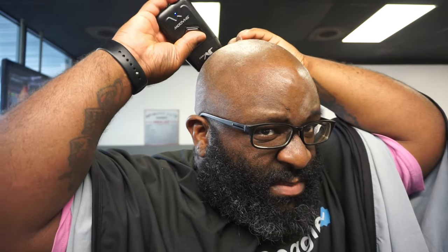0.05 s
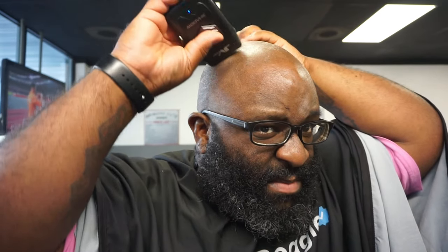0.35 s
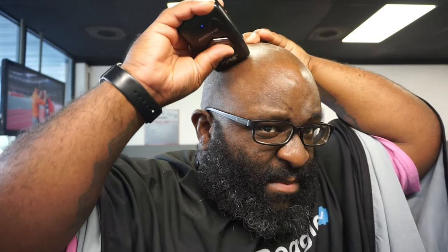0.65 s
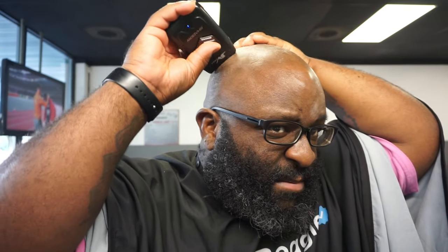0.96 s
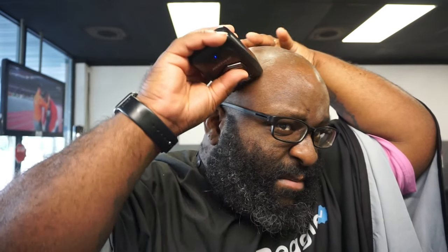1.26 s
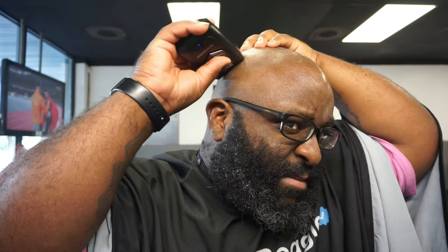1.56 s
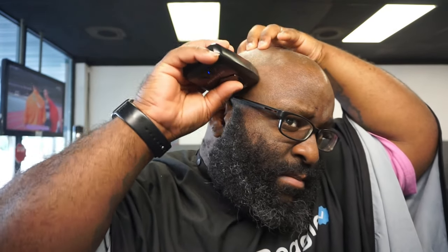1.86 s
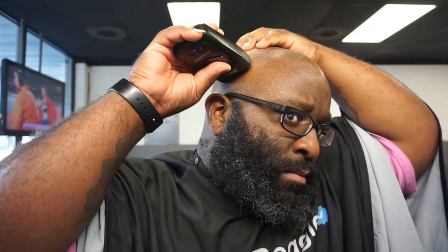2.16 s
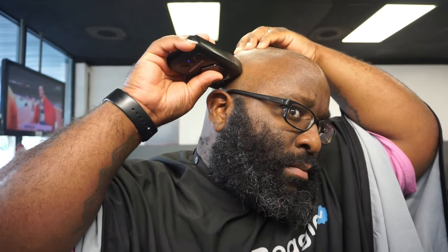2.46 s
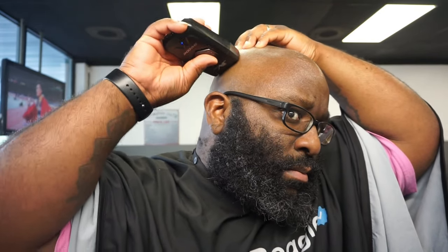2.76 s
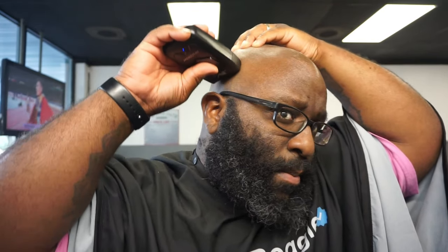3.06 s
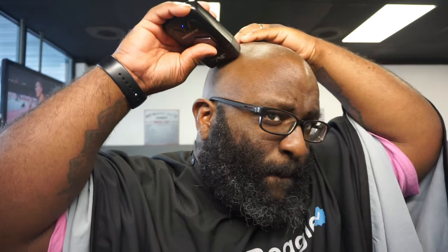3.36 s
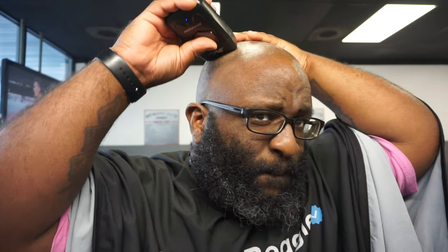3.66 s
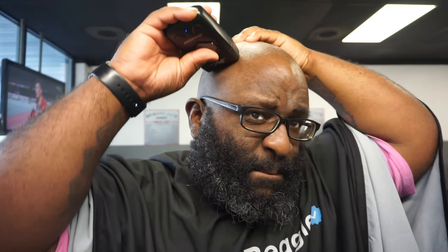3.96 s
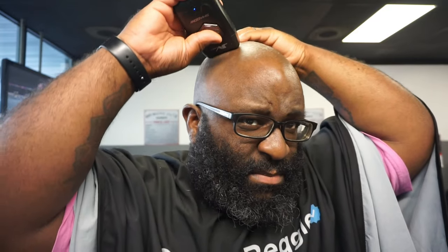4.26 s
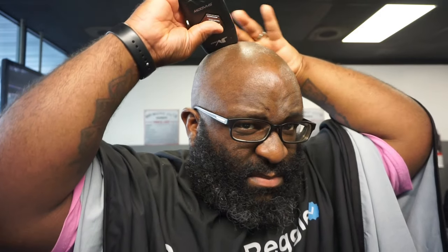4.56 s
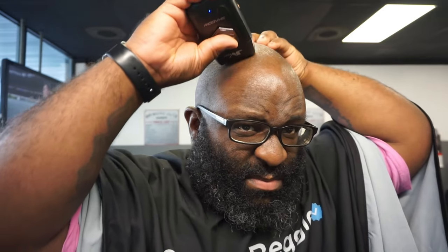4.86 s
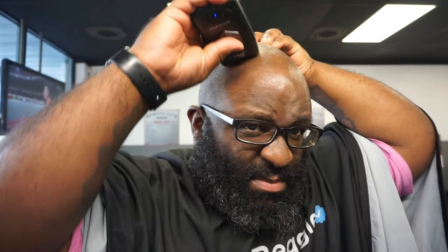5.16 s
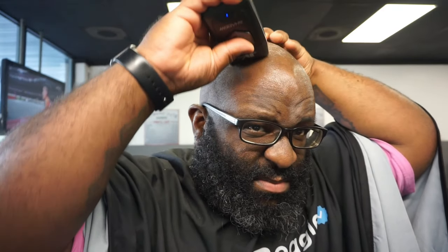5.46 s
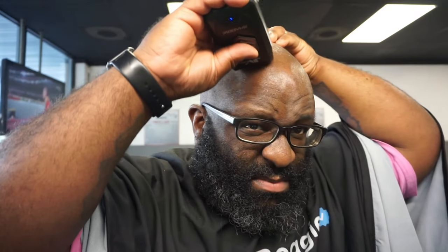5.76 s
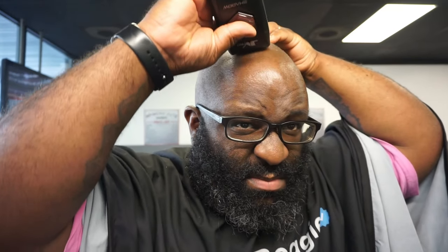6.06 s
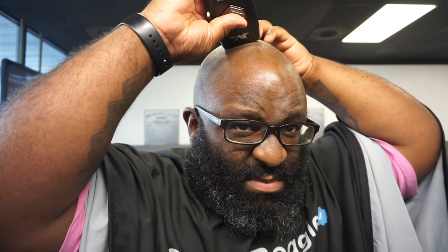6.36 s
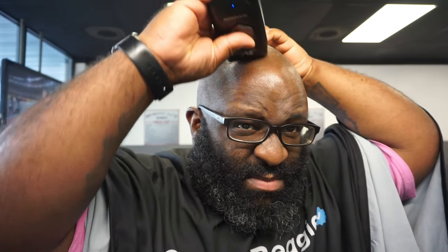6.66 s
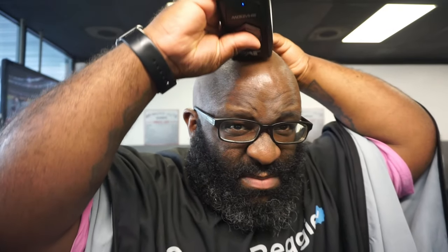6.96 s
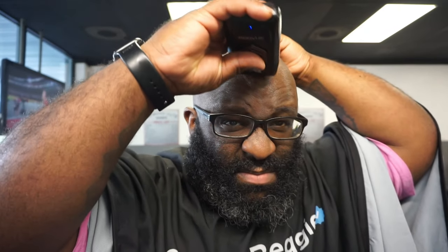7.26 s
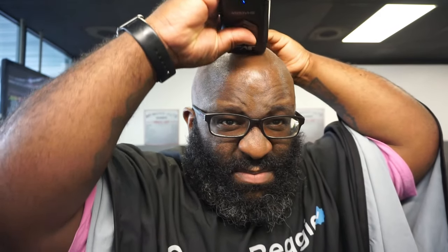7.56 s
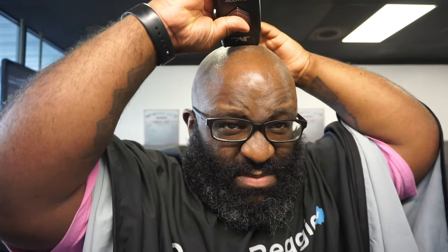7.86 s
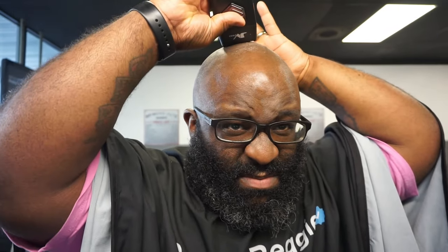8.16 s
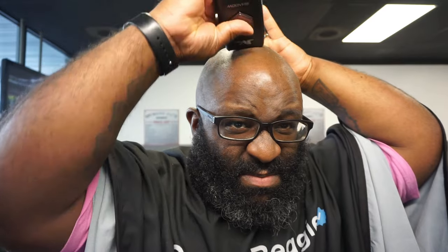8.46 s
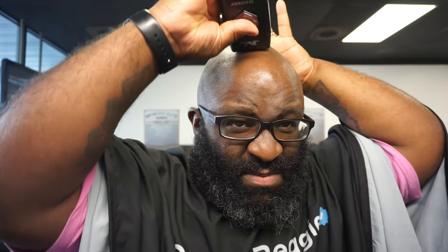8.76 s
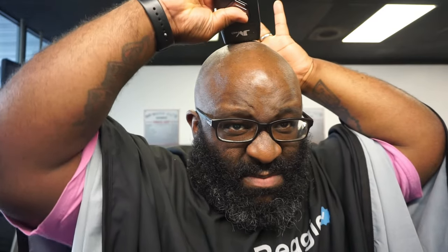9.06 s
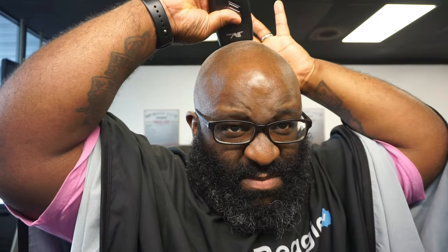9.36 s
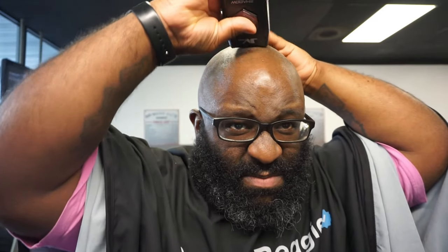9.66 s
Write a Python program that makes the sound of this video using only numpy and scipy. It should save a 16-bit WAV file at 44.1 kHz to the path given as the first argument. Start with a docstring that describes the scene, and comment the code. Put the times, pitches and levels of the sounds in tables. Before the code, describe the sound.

An electric foil shaver is already running, close to the microphone, and keeps going for the whole ten seconds or so as it moves over a scalp. Its motor buzz wavers slightly in pitch, with a bright, fluttering blade hiss on top. Short strokes through stubble, each a tenth to a third of a second, add a louder rattling rasp, often with a sharp little bite. They come irregularly from 0.3 to 3 seconds, near 3.8, from 4.6 to 5.9, from 6.5 to 7.4, around 8.5 and at 9.6. Between them the shaver glides with a softer whirr and hiss. The foil squeaks briefly on the skin near 0.9, 4.5, 8.3 and 9.4 seconds, and sings thinly around 2, 4.4 and 9 seconds. A faint electrical hum and low rumble of a small shop sit underneath.

```python
"""A small shop, a camera's stereo microphone close to a scalp being shaved with an electric foil shaver.
In each stroke the cutter knocks and rattles against the foil once a turn; between strokes the head
glides, the motor slows and the blades hiss. Now and then the foil squeaks or sings. Mains hum and rumble
lie underneath, ducked with everything else by the camera's gain control."""
import sys
import numpy as np
from scipy import signal
from scipy.fft import rfft, irfft, next_fast_len
from scipy.io import wavfile
from scipy.ndimage import uniform_filter1d, minimum_filter1d, map_coordinates

SR = 44100
rng = np.random.default_rng(int(sys.argv[2]) if len(sys.argv) > 2 else 0)


def wav_record(signal):
    """Record a signal, one row per channel, as 16-bit PCM in the file named by sys.argv[1]."""
    frames = np.transpose(np.atleast_2d(signal))
    bounded = np.clip(frames, -1, 1)
    # unit amplitude maps onto the largest positive 16-bit level
    quanta = np.round(bounded * 32767).astype(np.int16)
    wavfile.write(sys.argv[1], SR, quanta)


N = 428211
TIME = np.arange(N) / SR


def amp(db):
    """Decibels to gain."""
    return 10 ** (np.asarray(db) / 20)


def unit(x):
    """Scaled to rms 1."""
    return x / np.sqrt(np.mean(x ** 2) + 1e-20)


def even(x, size=1700):
    """Scaled to rms 1 over every few turns of the motor."""
    return x / np.sqrt(np.abs(uniform_filter1d(x ** 2, size)) + 1e-6 * np.mean(x ** 2))


def along(points, hz):
    """(f/Hz, value) points read on a log frequency axis."""
    freqs, values = np.transpose(points)
    return np.interp(np.log(hz + 1), np.log(freqs + 1), values)


def curves(rows):
    """One value per sample for each column after the time."""
    times, *columns = np.transpose(rows)
    return [np.interp(TIME, times, column) for column in columns]


def wobble(rate, times=TIME):
    """A smooth random curve, rate knots a second."""
    return map_coordinates(rng.standard_normal(1024), [times * rate], mode='wrap')


def swell(start, end):
    """A soft-edged window from start to end."""
    return np.sqrt(np.abs(np.sin(np.pi * np.clip((TIME - start) / (end - start), 0, 1))))


def blend(share, a, b):
    """Power mix: this share of a, the rest of b."""
    return np.sqrt(share) * a + np.sqrt(1 - share) * b


def filtered(x, response):
    """x times a response of frequency."""
    size = next_fast_len(N + SR // 2)
    return irfft(rfft(x, size) * response(np.fft.rfftfreq(size, 1 / SR)), size)[..., :N]


def ring(x, spectrum, size=4096):
    """x through a minimum-phase body with this spectrum."""
    cepstrum = irfft(np.log(amp(along(spectrum, np.fft.rfftfreq(size, 1 / SR)))))
    cepstrum[1:size // 2] *= 2
    cepstrum[size // 2 + 1:] = 0
    return signal.oaconvolve(x, irfft(np.exp(rfft(cepstrum))))[:N]


def pulses(times, strength, size=8):
    """Impulses at these times, placed between samples."""
    at = times[:, None] * SR
    taps = np.floor(at) + np.arange(1 - size, size + 1)
    shape = np.sinc(taps - at) * np.cos(np.pi * (taps - at) / (2 * size)) ** 2
    index = np.clip(taps, 0, N).astype(int)
    return np.bincount(index.ravel(), (strength[:, None] * shape).ravel(), N + 1)[:N]


def contacts(turns, place, spread, jitter_s, scatter_db, drift, count):
    """Parts touch count times a turn, over spread turns around place, drifting as the grip changes."""
    whole_turns = np.arange(-1, np.ceil(turns[-1]))
    turn_times = np.interp(whole_turns, turns, TIME)
    train = np.zeros(N)
    for k in range(count):
        phase = place + spread * ((k + .5) / count - .5) + drift * wobble(4, turn_times)
        late, strong = rng.standard_normal((2, 2048))[:, :len(turn_times)]
        when = np.interp(whole_turns + phase, turns, TIME, left=-1, right=-1) + jitter_s * late
        train += pulses(when, (when > 0) * wobble(6, turn_times) * amp(scatter_db * strong))
    return even(train)


def scrape(gate):
    """Friction noise under a gate."""
    return unit(gate * rng.standard_normal(N))


def lobe(turns, place, sharp):
    """A smooth bump once a turn."""
    return np.exp(sharp * (np.cos(2 * np.pi * (turns - place)) - 1))


# room tone, hum lines and rumble shape: f/Hz, level/dB
MAINS_HUM = [(60, -54), (120, -44), (180, -65)]
RUMBLE_SPECTRUM = [(15,-18),(30,-1),(55,-9),(90,-4.5),(160,2),(240,-3.5),(400,-5),(1000,-5),(4000,-54),(16000,-37)]


def room_tone(rumble_db=-45):
    """The shop behind the shaver: mains hum over a low rumble of air."""
    hum = sum(amp(db) * np.sin(2 * np.pi * (hz * TIME + rng.random())) for hz, db in MAINS_HUM)
    rumble = unit(ring(rng.standard_normal(N), RUMBLE_SPECTRUM))
    return np.sqrt(2) * hum + amp(rumble_db) * rumble


# what head, arm and walls send back to the microphone: f/Hz, level/dB
REFLECTED_SPECTRUM = [(100,-26),(500,-11),(1500,-16.5),(2800,-5.5),(6000,-4),(15000,-3.5)]
# the shop's reverberation time: f/Hz, t60/s
ROOM_DECAY = [(200,0.38),(3000,0.16),(15000,0.077)]


def reflections(x, near_s, far_db):
    """Close by, head and arm scatter the sound, differently to each port; the walls ring on longer."""
    hz, t, noise = signal.stft(rng.standard_normal((2, SR // 4)), SR, nperseg=256)
    walls = signal.istft(noise * amp(-60 * t / along(ROOM_DECAY, hz)[:, None]), SR, nperseg=256)[1]
    age = TIME[:walls.shape[1]]
    scatter = rng.standard_normal(len(age)) * np.exp(-age / near_s)
    near = np.array([[.4], [-.4]]) * scatter / np.linalg.norm(scatter)
    far = amp(far_db) * walls / np.linalg.norm(walls[0])
    reflected = signal.oaconvolve(x[None], near + far, axes=1)[:, :N]
    return filtered(reflected, lambda hz: amp(along(REFLECTED_SPECTRUM, hz)))


# the case's hum: t/s, level/dB at twice the motor speed, level/dB at three times
CASE_ORDERS = [(0.0, -47.5, -46), (3.2, -42, -48.5), (3.55, -50.0, -48.5), (4.15, -42.5, -48.5),
               (4.35, -62, -51), (4.5, -50.0, -45.5), (5.5, -44.5, -52), (6.15, -47.5, -49.5),
               (7.55, -48, -52.5), (7.9, -42.5, -39), (9.15, -49.5, -50.5), (9.7, -43.5, -42)]


def housing(turns):
    """The swinging cutters shake the case at low multiples of the speed; the hand damps it unevenly."""
    return np.sqrt(2) * sum(amp(db + 1.15 * wobble(12)) * np.sin(2 * np.pi * order * turns)
                            for order, db in enumerate(curves(CASE_ORDERS), 2))


# thin tones from the foil: start t/s, end t/s, multiple of the motor speed, level/dB
FOIL_WHINES = [(2.0,2.304,21,-32),(3.084,3.22,21,-32),(3.376,3.495,22,-31),(4.303,4.517,23,-28.5),(5.43,5.494,23,-35),(7.936,8.1,23,-32.5),(8.94,9.303,23,-31)]


def whines(turns):
    """One multiple of the motor speed meets the foil's resonance and sings."""
    return np.sqrt(2) * sum(amp(db) * swell(start, end) * np.sin(2 * np.pi * multiple * turns)
                            for start, end, multiple, db in FOIL_WHINES)


# the foil drawn back over the scalp: start t/s, end t/s, start f/Hz, end f/Hz, level/dB
FOIL_SQUEAKS = [(0,.2,1750,1550,-33),(.85,.96,1720,1640,-25),(1.6,1.76,1620,1560,-31),(4.45,4.6,1780,1700,-27),(8.23,8.38,1980,1620,-27),(9.29,9.5,1950,1640,-26)]


def squeaks(turns):
    """The thin foil squeaks on the skin, pulsing as the blades pass."""
    out = np.zeros(N)
    for start, end, from_hz, to_hz, db in FOIL_SQUEAKS:
        span = slice(int(start * SR), int(end * SR))
        t = TIME[span]
        hz = np.interp(t, [start, end], [from_hz, to_hz]) + 55 * wobble(300, t)
        grip = 1 + .5 * np.sin(2 * np.pi * turns[span]) + .19 * wobble(230, t)
        out[span] += amp(db) * swell(start, end)[span] * grip * np.sin(2 * np.pi * np.cumsum(hz) / SR)
    return out


# the foil's edge biting: start t/s, end t/s, resonance f/Hz, level/dB
EDGE_BITES = [(.32,.44,3670,-18),(1.022,1.122,1670,-21.5),(1.348,1.36,2280,-22),(1.85,1.97,1770,-23),(2.36,2.605,5830,-30.5),(2.545,2.619,1770,-26),(2.948,3.05,1760,-21),(3.58,3.644,3490,-28),(3.943,3.98,2180,-21),(5.107,5.236,3750,-27),(5.33,5.39,2290,-22.5),(5.83,5.907,2200,-23),(6.543,6.595,4500,-24),(6.84,6.9,2300,-24),(7.31,7.365,2577,-20.5),(8.56,8.598,3930,-19.5),(8.689,8.752,2430,-28)]


def bites(turns):
    """Abrupt runs of hard blows, a cluster a turn, into a resonance set by how the foil is bent."""
    blows = contacts(turns, place=.93, spread=.138, jitter_s=1.2e-5, scatter_db=.7, drift=.0093, count=3)
    out = np.zeros(N)
    for start, end, hz, db in EDGE_BITES:
        span = slice(int(start * SR), int(end * SR))
        gate = np.clip(np.minimum(TIME[span] - start, end - TIME[span]) / .0014, 0, 1)
        b, a = signal.iirpeak(hz, Q=2.6, fs=SR)
        ringing = signal.lfilter(b, a, signal.lfilter(b, a, blows[span]))
        out[span] += amp(db) * gate * unit(ringing)
    return out


# strokes against the stubble: catch t/s, release t/s, place of the hardest push (0-1), push/dB,
# then level/dB before the push for knock, whirr, foil ring, rattle and buzz
SHAVING_STROKES = [(0.325, 0.644, 0.38, 4.5, -27, -25, -24.5, -25.5, -23.5),
                   (0.817, 0.893, 0.4, 3.2, -35.0, -22.5, -28, -22.5, -25.5),
                   (1.01, 1.384, 0.5, 5, -26, -24, -25, -24.0, -23.5),
                   (1.769, 1.966, 0.56, 8, -28, -21, -25.5, -25.5, -23),
                   (2.34, 2.61, 0.58, 0.5, -35, -24.5, -26.5, -25.0, -28.5),
                   (2.86, 3.071, 0.4, 4.5, -30.5, -25.0, -28.0, -33, -38),
                   (3.692, 3.991, 0.36, 5, -28, -25.5, -25, -28.5, -27.5),
                   (4.649, 4.927, 0.37, 4, -29, -27, -26, -26.5, -25.5),
                   (5.06, 5.385, 0.55, 1, -26, -24, -24.5, -22, -20.5),
                   (5.58, 5.7, 0.87, 8.5, -39, -24, -28.5, -30, -24.5),
                   (5.752, 5.925, 0.6, 2, -23.5, -28.0, -23, -24, -22),
                   (6.532, 6.605, 0.4, 5, -23.5, -28.5, -24, -30, -27),
                   (6.686, 6.897, 0.47, 5.5, -26.5, -26.5, -27, -24, -26),
                   (7.129, 7.38, 0.58, -2.5, -29, -24.5, -28, -21, -26.5),
                   (8.424, 8.535, 0.54, 2, -22, -22, -19, -28, -38),
                   (8.552, 8.744, 0.49, -0.5, -29, -25.5, -23.5, -25.0, -24.0),
                   (9.548, 9.8, 0.56, 5.5, -26, -22.5, -23, -27.0, -32)]


def strokes(catch_s=.023, release_s=.0071):
    """The foil lands, is pushed and lifts: contact (0-1), push/dB and the five levels, per sample."""
    rows = np.array(SHAVING_STROKES)
    nearest = np.searchsorted((rows[:-1, 1] + rows[1:, 0]) / 2, TIME)
    catch, release, peak, push_db, *levels = rows[nearest].T
    contact = np.clip(np.minimum((TIME - catch) / catch_s, (release - TIME) / release_s) + .5, 0, 1)
    progress = np.clip((TIME - catch) / (release - catch), 0, 1)
    skew = np.log(.5) / np.log(np.clip(peak, .1, .9))  # moves the top of the arch to peak
    return contact, push_db * np.sin(np.pi * progress ** skew) ** 2, *levels


# blade hiss close to the microphone: t/s, level/dB, top treble lift/dB
HISS_LEVELS = [(0.0, -20, -3), (0.24, -24.5, 0.5), (0.32, -18, 1.1), (0.52, -18.5, 0), (0.76, -20.5, 5),
               (1.32, -18.5, -2), (1.48, -23.5, 8), (1.6, -14.5, 2.5), (1.72, -17, 2), (1.88, -22, -8),
               (2.08, -23, 12), (2.56, -24.5, 1), (2.72, -23, 2.5), (3.44, -21, -3), (4.08, -21, 6.5),
               (4.4, -21.8, -0.5), (4.96, -21, -4), (5.32, -21.5, 2), (5.44, -16, 9), (6.16, -17, -3.3),
               (6.4, -13, 6.5), (6.92, -25.5, -2), (7.0, -17.5, -3), (7.4, -24, 2.5), (7.64, -20.5, -1.5),
               (8.28, -16.5, -3.5), (8.52, -19.5, -3), (9.16, -21.5, 4), (9.28, -20.5, -8), (9.7, -17.5, 1)]
# colour of the hiss and of the buzz: f/Hz, relative level/dB
HISS_SPECTRUM = [(400,-37.5),(900,-17),(2000,-6),(3500,-9.5),(4300,-13),(5300,-12.5),(6100,-8.5),(7300,-13),(9200,-11),(10300,-6.5),(11400,-2.5),(12900,.5),(14500,-1.5),(16000,-3.5)]
BUZZ_SPECTRUM = [(1500,-20),(4400,6),(5400,2),(5950,9),(6600,1),(8600,-2),(9200,1),(9750,10),(10600,2.5),(12500,5.5),(14000,-12),(15500,-0.5)]


def blades(turns):
    """The blades hiss along the foil twice a turn and snip stubble; under pressure a hard buzz joins."""
    contact, push_db, *_, buzz_db = strokes()
    hiss_db, lift_db = curves(HISS_LEVELS)
    sweep = .31 + lobe(turns, .752, sharp=1.56) + .76 * lobe(turns, .24, sharp=3.2)
    snips = unit(sweep * pulses(rng.uniform(0, N / SR, 20000), rng.standard_normal(20000)))
    hiss = ring(scrape(sweep) + .26 * snips, HISS_SPECTRUM)
    # the hiss brightens and darkens as the shaver head tilts
    treble = filtered(hiss, lambda hz: np.clip((hz - 12500) / 2000, 0, 1))
    hiss += (amp(lift_db + 3.8 * wobble(7)) - 1) * treble
    edges = contacts(turns, place=.87, spread=.2014, jitter_s=4e-6, scatter_db=2, drift=.0085, count=14)
    buzz = ring(edges + 1.3 * scrape(lobe(turns, .88, sharp=4)), BUZZ_SPECTRUM)
    flutter = amp(1.7 * wobble(30))
    return flutter * (amp(hiss_db) * even(hiss) + contact * amp(buzz_db + push_db) * even(buzz))


# gliding between strokes: t/s, dull body level/dB, bright metal level/dB
GLIDE_LEVELS = [(0.0, -26.6, -28.6), (0.12, -33.5, -37), (0.28, -27.5, -30.5), (0.72, -34, -31),
                (0.96, -22, -25.5), (1.48, -30, -32), (1.72, -24, -29), (2.24, -34.5, -32),
                (2.76, -32, -30), (3.2, -30, -28.5), (3.32, -24, -28), (3.52, -35.5, -32),
                (3.6, -28.5, -24.5), (4.12, -30, -29.5), (4.44, -27, -28.5), (4.64, -26.5, -28.5),
                (6.16, -31, -29.5), (7.44, -30, -27.5), (7.56, -26, -29), (8.16, -28.5, -32.5),
                (8.28, -23.5, -29), (8.84, -30, -28.5), (8.96, -28.5, -33), (9.16, -32.5, -34),
                (9.36, -24, -23), (9.7, -26.0, -31)]
# the cutter's four voices at close range, dull to bright: f/Hz, relative level/dB
KNOCK_SPECTRUM = [(300,-54),(480,-18.5),(620,-4.5),(700,-5),(780,1),(860,-3.5),(925,1),(1020,-6),(1115,6),(1200,-12),(1270,-3.5),(1700,-2.5),(2000,-10.5),(2350,3),(2900,-6),(4000,-33),(8000,-41)]
WHIRR_SPECTRUM = [(500,-32),(900,-15),(1250,-12.5),(1420,-2),(1580,0),(1730,4),(1900,1),(2080,-8),(2300,-11.5),(2650,-8),(3100,-23),(6000,-33)]
FOIL_SPECTRUM = [(1500,-50),(2300,-7.5),(3000,-9.5),(3450,3),(3750,1.5),(4300,-5),(5400,-20),(10000,-32)]
RATTLE_SPECTRUM = [(900,-29.5),(2200,-6),(3200,-5),(4300,6),(5000,-1),(5450,0),(5900,6),(6500,1),(7300,-4.5),(9100,-2.5),(9750,-4),(11000,-12),(16000,-11)]
# share of blows landing cleanly: in a stroke, gliding at USUAL_HZ, and gained per Hz above that
STROKE_SEATED, GLIDE_SEATED, SEATED_PER_HZ, USUAL_HZ = .85, .34, .044, 155


def cutter(turns, speed):
    """The drive chatters all round the turn; pressed, the cutter hits the foil in one burst a turn."""
    contact, push_db, knock_db, whirr_db, foil_db, rattle_db, _ = strokes()
    body_db, metal_db = curves(GLIDE_LEVELS)
    gliding = GLIDE_SEATED + SEATED_PER_HZ * (speed - USUAL_HZ) + .12 * wobble(9)
    seated = np.clip(gliding + contact * (STROKE_SEATED - gliding), 0, 1)
    chatter = contacts(turns, place=.5, spread=1, jitter_s=1.2e-5, scatter_db=1.5, drift=.025, count=9)
    strike = contacts(turns, place=.97, spread=.2825, jitter_s=6e-6, scatter_db=2.3, drift=.029, count=6)
    bounce = contacts(turns, place=.87, spread=.25, jitter_s=5e-6, scatter_db=.6, drift=.008, count=9)
    rub = scrape(.21 + lobe(2 * turns, .49, sharp=1))
    knock = ring(blend(seated, strike + .5 * chatter, chatter + .52 * rub), KNOCK_SPECTRUM)
    whirr = ring(blend(seated, strike + .82 * chatter, chatter + .5 * rub), WHIRR_SPECTRUM)
    foil = ring(blend(seated, bounce + .79 * chatter, .13 * chatter + 1.1 * rub), FOIL_SPECTRUM)
    rattle = ring(blend(seated, bounce + .25 * chatter, .35 * chatter + rub), RATTLE_SPECTRUM)
    # sound, stroke level/dB, glide level/dB; the bright parts follow the push most
    parts = [(knock, knock_db + .1 * push_db, body_db - 9.5),
             (whirr, whirr_db + .51 * push_db, body_db - 1),
             (foil, foil_db + push_db, metal_db - 2.5),
             (rattle, rattle_db + push_db, metal_db - 3)]
    # the skin's drag makes them all flutter; each also wavers as the shaver head tilts
    flutter = amp(1.79 * wobble(32))
    return flutter * sum(
        even(sound) * amp(contact * stroke_db + (1 - contact) * glide_db + 2.06 * wobble(14))
        for sound, stroke_db, glide_db in parts)


# the motor's turns a second: t/s, f/Hz
MOTOR_SPEED = [(0.0, 150.6), (0.08, 150.8), (0.24, 156.3), (0.36, 154.1), (0.64, 159.3), (0.76, 155.9),
               (1.12, 154.1), (1.24, 158.4), (1.44, 159.1), (1.64, 152.0), (1.88, 157.7), (2.04, 156.5),
               (2.2, 159.6), (2.36, 157.4), (2.68, 159.4), (2.88, 155.7), (3.04, 159.1), (3.2, 159.1),
               (3.48, 153.7), (3.72, 153.5), (3.92, 158.1), (4.08, 159.2), (4.2, 156.0), (4.6, 154.0),
               (4.8, 159.0), (5.04, 155.0), (5.24, 155.7), (5.32, 159.6), (5.48, 159.3), (5.52, 156.5),
               (5.96, 158.0), (6.08, 153.2), (6.32, 151.7), (6.76, 156.9), (6.84, 159.4), (7.0, 158.7),
               (7.04, 154.3), (7.28, 156.9), (7.32, 159.9), (7.48, 158.2), (7.72, 151.6), (8.36, 149.8),
               (8.4, 153.7), (8.64, 156.1), (8.68, 159.2), (8.76, 159.6), (8.96, 154.9), (9.2, 154.1),
               (9.36, 148.7), (9.44, 149.4), (9.52, 154.4), (9.7, 156.8)]


def scene():
    """One motor drives every part of the shaver, close to the microphone, with the shop around it."""
    speed, = curves(MOTOR_SPEED)
    turns = np.cumsum(speed) / SR
    shaver = cutter(turns, speed) + bites(turns) + blades(turns)
    shaver += squeaks(turns) + whines(turns) + housing(turns)
    direct = shaver + room_tone()
    return direct + reflections(direct, near_s=.012, far_db=-.5)


def gain_control(x, threshold_db=-11, squeeze=.61, recover_db_per_s=78, size=441):
    """Peaks over the threshold turn everything down at once; the gain climbs back at a steady rate."""
    peak_db = 20 * np.log10(1e-6 - minimum_filter1d(-np.abs(x).max(axis=0), size))
    excess_db = np.maximum(peak_db - threshold_db, 0)
    climb_db = recover_db_per_s * TIME
    cut_db = np.maximum.accumulate(squeeze * excess_db + climb_db) - climb_db
    return x * amp(-uniform_filter1d(cut_db, size))


# the microphone's two ports: f/Hz, left minus right level/dB
PORT_BALANCE = [(100,0),(700,1),(1600,1),(2800,0.6),(4400,3),(8000,2.5),(15000,1.5)]


def record(dry, top_hz=15800):
    """The camera's microphone: brighter on the left, strokes held down by gain control, band-limited."""
    ports = filtered(dry, lambda hz: amp(np.array([[.5], [-.5]]) * along(PORT_BALANCE, hz)))
    return filtered(gain_control(ports), lambda hz: hz < top_hz)


dry = scene()
out = record(dry)
wav_record(out)
```